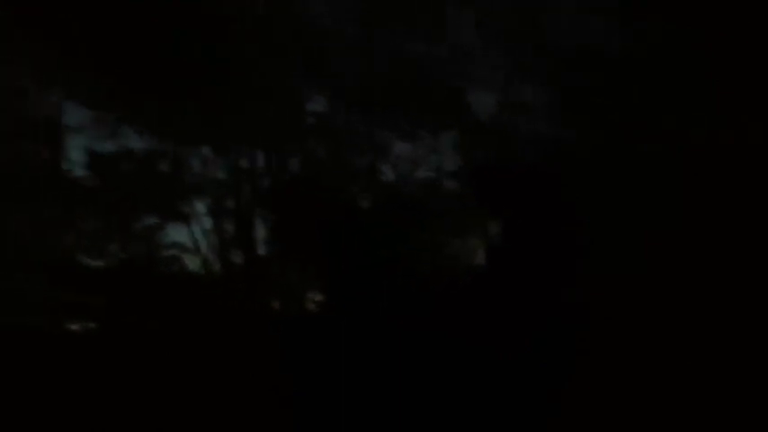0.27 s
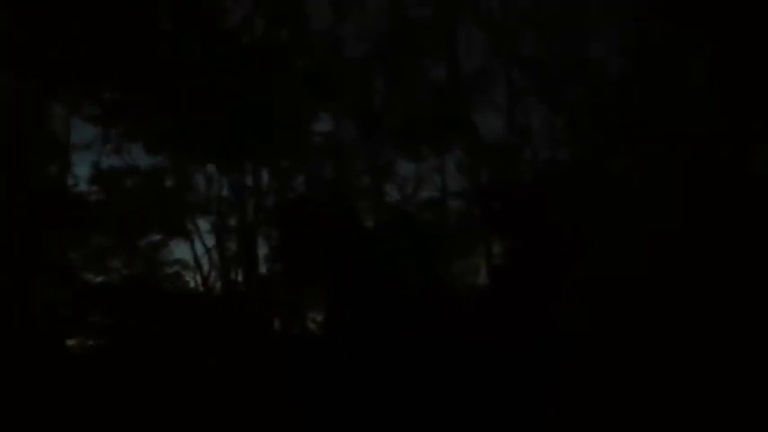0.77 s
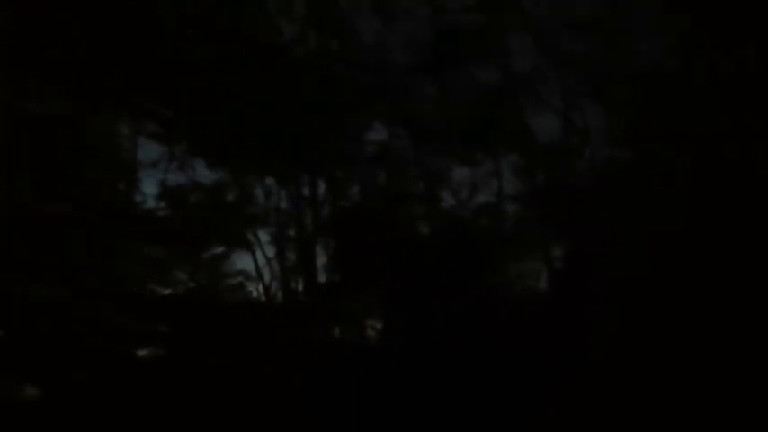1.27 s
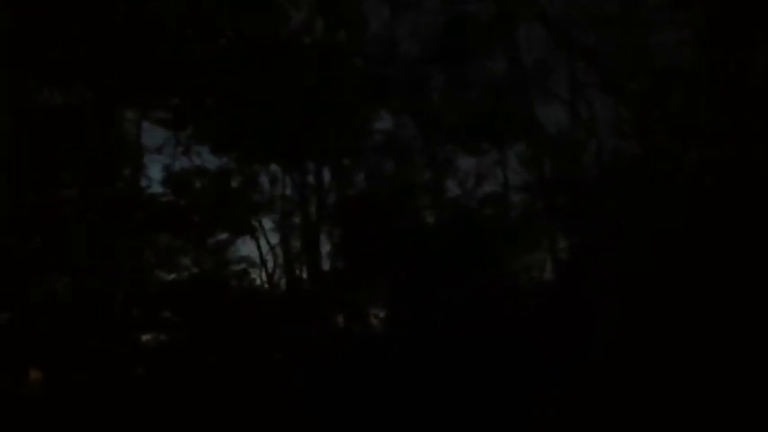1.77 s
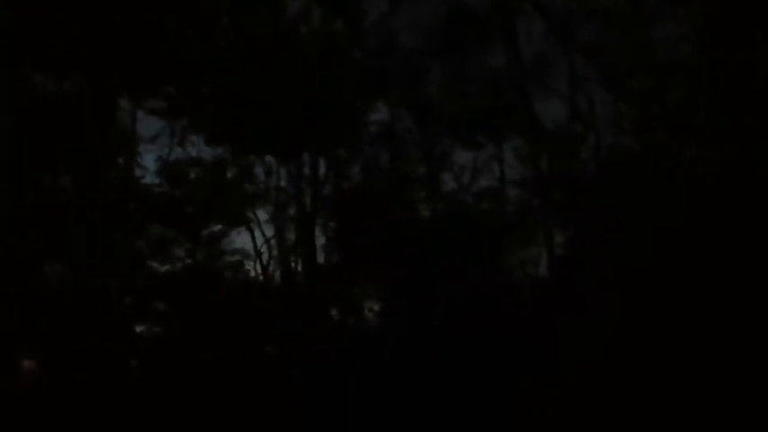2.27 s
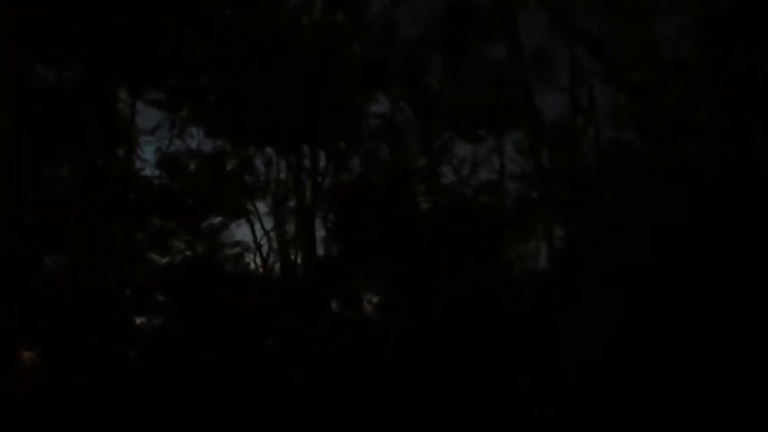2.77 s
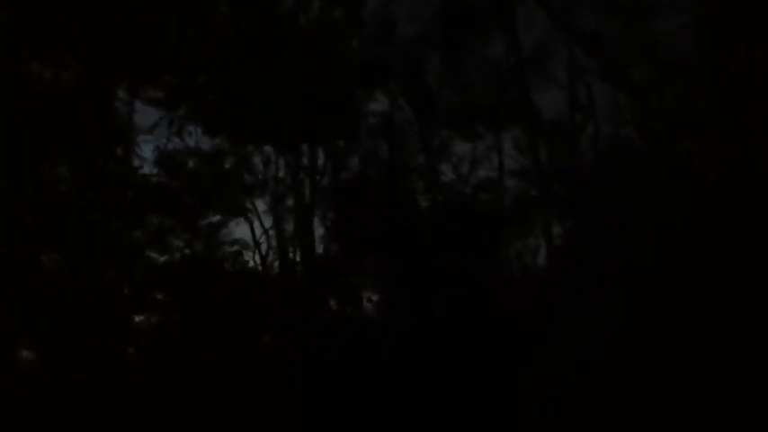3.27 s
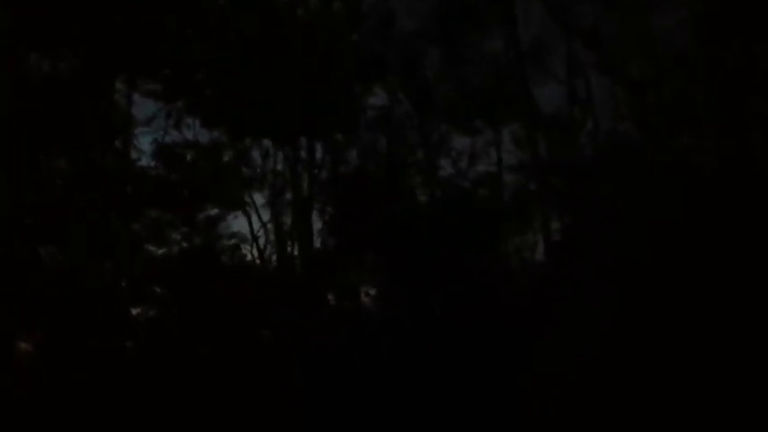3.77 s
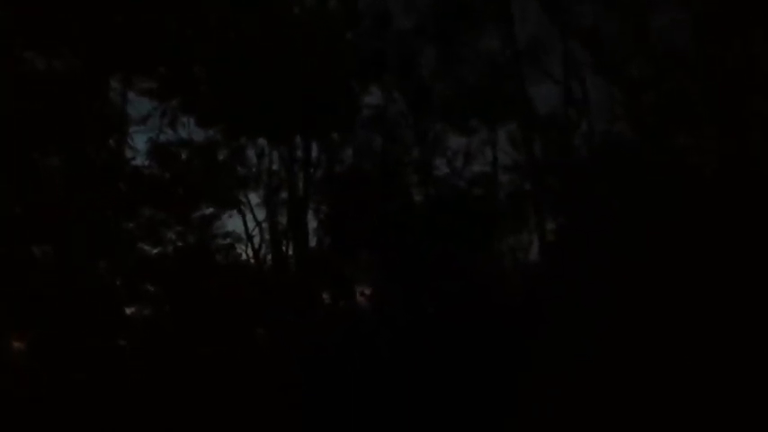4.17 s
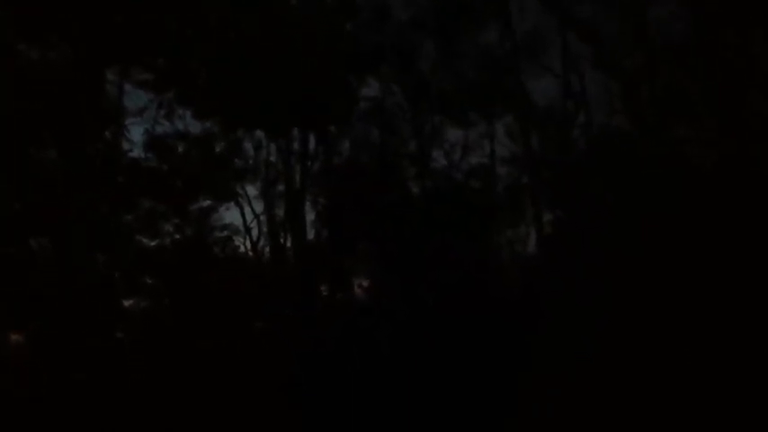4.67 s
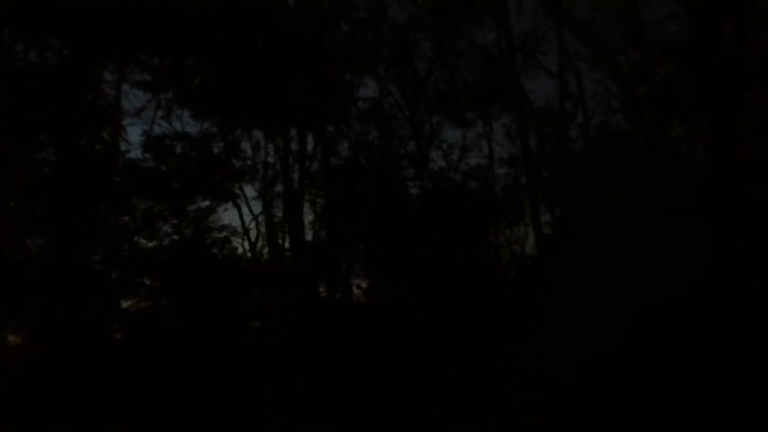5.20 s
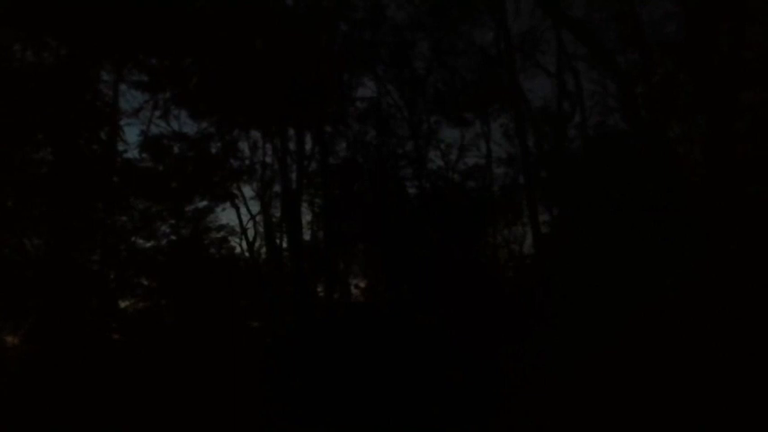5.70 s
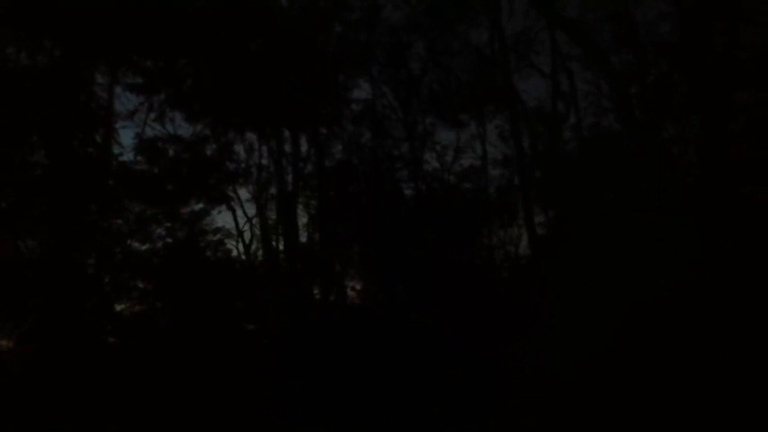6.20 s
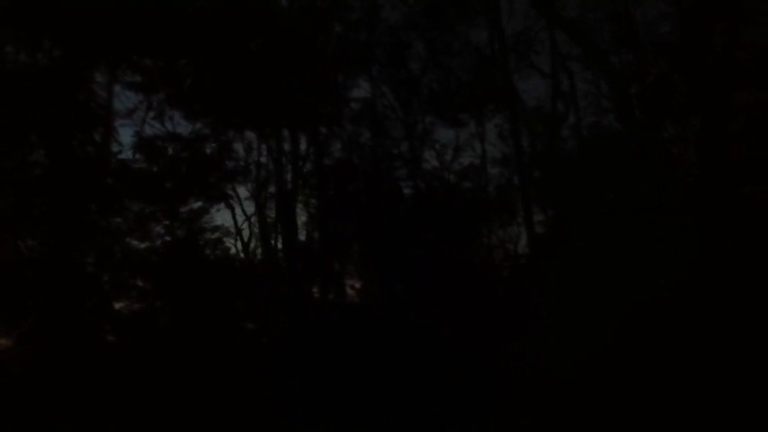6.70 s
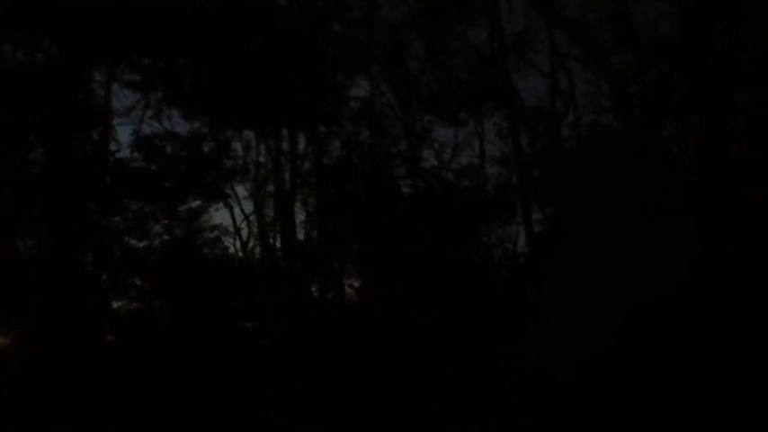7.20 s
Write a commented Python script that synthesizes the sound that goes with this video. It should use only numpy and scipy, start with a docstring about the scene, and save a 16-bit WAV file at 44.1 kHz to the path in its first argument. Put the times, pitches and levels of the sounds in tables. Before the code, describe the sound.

Continuous high insect trilling fills a wooded night, buzzing rapidly and shimmering, with faint low air beneath. Early on, bright katydid rasps lean left while fingers rub and bump the recorder on the right, with one clear knock and a few softer ones. Afterwards only tiny ticks, slight rustles, a faraway three-note bird phrase and a faint late warble touch the steady chorus.

```python
"""A night chorus of insects at two microphone ports: five near singers trill over the blur of far ones and night air.
At the start a katydid rasps five calls, and a far bird begins a falling three-note phrase it repeats to the end.
From half a second fingers bump the recorder beside the right port as the hand rubs; small things tick close by.
Faint rustling comes at the start, again before two seconds and near the end, where something warbles faintly.
Trills are tones locked to wing strokes, rasps and air are shaped noise, calls are glides, bumps are dying swings."""
import sys
import numpy as np
from scipy import signal
from scipy.fft import rfft, irfft
from scipy.io import wavfile
from scipy.ndimage import uniform_filter1d

SR = 44100
rng = np.random.default_rng(int(sys.argv[2]) if len(sys.argv) > 2 else 0)


def unload_audio(sound):
    """Save the sound as a 16-bit wav file, at the path given as the first command line argument."""
    columns = np.transpose(np.atleast_2d(sound))
    # keep every value between -1 and 1, then stretch to whole-number steps
    steps = np.round(np.clip(columns, -1, 1) * 32767)
    wavfile.write(sys.argv[1], SR, steps.astype(np.int16))


N = 328545
TIME = np.arange(N) / SR


def gain_of(db):
    """Amplitude factor of a level in dB."""
    return 10 ** (np.asarray(db) / 20)


def evened(x):
    """Scale to an rms of one."""
    return x / np.sqrt(np.mean(x ** 2) + 1e-20)


def read(points, hz):
    """Read a table of (f/Hz, value) along a logarithmic pitch scale."""
    f, value = np.transpose(points)
    return np.interp(np.log(hz + 1), np.log(f + 1), value)


def curve(rows, column):
    """Draw one column of a table over time, straight from row to row."""
    columns = np.transpose(rows)
    return np.interp(TIME, columns[0], columns[column])


def band(x, lo_hz, hi_hz):
    """Keep the sound between two pitches."""
    return signal.sosfilt(signal.butter(2, [lo_hz, hi_hz], "bandpass", fs=SR, output="sos"), x)


def port_noise():
    """Unrelated white noise at each port."""
    return rng.standard_normal((2, N))


def hiss(field_db):
    """Unrelated noise at each port, shaped by field_db(Hz, s) and by the colour of the port; mono rms is one."""
    # Unlike microphone ports: f/Hz, left minus right level/dB
    ports = [(60, -3.5), (92, -1.5), (140, -3), (210, -2), (330, -3.5), (500, -2.5), (770, -3.5),
             (1170, -2.5), (1790, -2.5), (2740, -1.5), (4190, 1), (6410, 9.5), (9810, 13), (15000, 12)]
    hz = np.fft.rfftfreq(1024, 1 / SR)[:, None]
    t = np.arange(N // 256 + 5) * 256 / SR
    real, imaginary = rng.standard_normal((len(t), len(hz), 2, 2)).T
    left_power = 1 / (1 + gain_of(-2 * read(ports, hz)))
    port_gain = np.sqrt([left_power, 1 - left_power])
    spectrum = (real + 1j * imaginary) * port_gain * gain_of(field_db(hz, t))
    out = signal.istft(spectrum, nperseg=1024, noverlap=768)[1][:, :N]
    return out / np.sqrt(np.mean(out.mean(0) ** 2))


def foliage(x, spread_s=.008, ripple_db=1.5):
    """Leaves and trunks delay each pitch by another time at each port, and colour it a little."""
    steps, ripple = rng.standard_normal((2, 2, 2049))
    # spread_s is the spread of the delay averaged over 60 Hz
    phase = np.cumsum(steps, 1) * 2 * np.pi * spread_s * np.sqrt(SR / 4096 * 60)
    colour = gain_of(ripple_db * evened(uniform_filter1d(ripple, 3)))
    paths = np.fft.fftshift(irfft(colour * np.exp(1j * phase)), 1)
    return signal.oaconvolve(x, paths, "same", axes=1)


def stroke(turns, sharpness):
    """One swell of loudness per closing of the wings, shorter as sharpness grows."""
    return evened(np.exp(sharpness * (np.cos(2 * np.pi * turns) - 1)))


def whistle(s, length, from_hz, to_hz, db, pan_db, waver):
    """A soft gliding tone that swells and fades; pan_db is left minus right, waver bends it in Hz."""
    progress = np.clip((TIME - s) / length, 0, 1)
    cycles = np.cumsum(from_hz + (to_hz - from_hz) * progress + waver) / SR
    tone = np.sin(np.pi * progress) * np.sin(2 * np.pi * cycles)
    return gain_of(db + np.array([[pan_db / 2], [-pan_db / 2]])) * 2 * tone


def near_singers():
    """Five insects close by, each with its own stroke rate, wing tones and bouts of effort."""
    # Wing strokes: rate/(strokes/s), drift/(strokes/s per s), rush/(extra strokes/s at the full-effort time),
    # sharpness of the stroke, least hoarseness as spread of a tone/Hz
    paces = [(58.72, .009, 0, .8, 1), (60.05, .057, 0, 1.4, 1.5), (57.12, -.035, 0, .9, 1.5),
             (57.2, 0, .035, .9, 1), (55.85, .107, 1.9, .9, 1.2)]
    # Wing tones, one list a singer: f/(multiples of the stroke rate)
    wing_tones = [
        [52, 64, 79, 92, 139],
        [83, 95],
        [81, 96],
        [119, 126, 131, 141, 145, 150, 154],
        [79, 91.82, 100.5, 104.33, 114.3, 142.55, 153.1],
    ]
    # Strength of each wing tone: left level/dB, right level/dB
    wing_levels = [
        [(-68, -64), (-62, -59), (-51, -51), (-39, -44), (-43, -57)],
        [(-40, -41), (-31, -33)],
        [(-54, -54), (-43, -40)],
        [(-46, -54), (-43, -51), (-35, -50), (-37, -52), (-38, -53), (-38, -54), (-39, -55)],
        [(-51, -53), (-40, -45), (-38, -40), (-36.5, -37.5), (-46, -50), (-38, -54), (-40, -57)],
    ]
    # Effort: rises from t/s, full at t/s, level before/dB, tires from t/s, level when tired/dB
    efforts = [(0, 1, 0, 6, 0), (0, 1, 0, 1.5, -3), (0, 2.5, -7, 3.9, -9), (3.5, 5.5, -6, 7, 0),
               (2.4, 3.6, -25, 4.4, -1)]
    return sum(singer(*parts) for parts in zip(paces, wing_tones, wing_levels, efforts))


def singer(pace, tones, tone_db, effort, fade_db=1.3):
    """Wing tones locked to the stroke; hoarseness is a random walk of their phase; moving air fades each tone."""
    settle_s, tiring_s = .66, .7  # a rush dies away; a singer tires
    hoarse_per_db, hoarse_per_rush = .4, 36  # Hz per dB off full effort, Hz per extra stroke/s
    rate, drift, rush, sharpness, hoarse_hz = pace
    rise_s, full_s, before_db, tire_s, tired_db = effort
    rush = rush * np.exp((full_s - np.maximum(TIME, rise_s)) / settle_s)
    effort_db = np.interp(TIME, [rise_s, full_s, tire_s, tire_s + tiring_s], [before_db, 0, 0, tired_db])
    turns = np.cumsum(rate + drift * TIME + rush) / SR
    # weak or rushed strokes are hoarse
    spread_hz = hoarse_hz + hoarse_per_db * abs(effort_db) + hoarse_per_rush * rush
    slip = np.cumsum(rng.standard_normal(N) * np.sqrt(2 * np.pi * spread_hz / SR))
    # ten fade points a second, smoothed over four
    fades = uniform_filter1d(rng.standard_normal((len(tones), 80)), 4)
    fades = [np.interp(TIME, np.arange(80) / 10, row) for row in gain_of(fade_db * evened(fades))]
    ringing = fades * np.cos(2 * np.pi * np.outer(tones, turns) + slip)
    wing = gain_of(tone_db).T @ ringing
    return foliage(np.sqrt(2) * wing * stroke(turns, sharpness) * gain_of(effort_db))


def katydid(teeth_per_s=650):
    """Uneven tooth strikes ring a broad, high wing; every call is the same pair of strokes."""
    # Calls: t/s, level/dB
    calls = [(-.067, -26), (.168, -28), (.372, -24.5), (.606, -27.5), (.83, -27)]
    # A short stroke, then a long one: delay/s, rise/s, base decay t60/s, level/dB
    strokes = [(0, 0.011, 0.13, -3), (.037, .02, 0.21, -0.5)]
    # Wing bands, the low end sounds first and dies first: f/Hz, width/Hz, level/dB, speed of decay, lead t/s
    wing_bands = [(14420, 700, -2, 0.87, 0), (13700, 1900, -6, 0.77, 0.006),
                  (12400, 2000, -12.5, 2.2, 0.021)]
    strikes = (rng.random((2, N)) < teeth_per_s / SR) * port_noise()
    teeth = strikes + 0.24 * port_noise()
    out = np.zeros((2, N))
    for hz, width, wing_db, speed, lead in wing_bands:
        drive = np.zeros(N)
        for s, db in calls:
            for after, rise, t60, part_db in strokes:
                t = TIME - s - after + lead
                decay_db = -60 * speed * np.maximum(t - rise, 0) / t60
                drive += np.clip(t / rise, 0, 1) * gain_of(db + part_db + decay_db)
        out += gain_of(wing_db) * evened(band(teeth, hz - width / 2, hz + width / 2)) * drive
    return out * gain_of([[5], [-8]])  # stronger at the left port


def place(out, s, sound, left_db):
    """Add a sound at time s, with the left port left_db against the right."""
    out[:, round(s * SR):][:, :len(sound)] += sound * gain_of([[left_db], [0]])


def without_treble(x):
    """Soft contact has little treble: a gentle low-pass at 2300 Hz."""
    return signal.lfilter(*signal.butter(2, 2300, fs=SR), x)


def bumps():
    """Soft fingertips snap against the case beside the right port; the case swings and the recorder rocks."""
    # Bumps on the case: t/s, level/dB, contact time/s
    bump_rows = [(.502, -12, 0.012), (1.0304, -2.5, 0.00053), (1.135, -14, 0.0015), (1.152, -15, 0.0061),
                 (1.167, -12.5, 0.0031)]
    case_hz, case_t60, snap_cycles = 124.5, 0.034, 0.46  # Hz, s, extra cycles run during contact
    thump_hz, thump_t60, thump_db = 49.7, 0.28, -17  # Hz, s, dB: the whole recorder rocks in the hand
    out = np.zeros((2, N))
    t = np.arange(12000) / SR
    for s, db, contact_s in bump_rows:
        cycles = case_hz * t + snap_cycles * (1 - np.exp(-t / contact_s))
        swing = -np.sin(2 * np.pi * cycles) * gain_of(-60 * t / case_t60)
        rock = np.sin(2 * np.pi * thump_hz * t) * gain_of(thump_db - 60 * t / thump_t60)
        place(out, s, (swing + rock) * gain_of(db), left_db=-35)
    return without_treble(out)


def ticks():
    """Small things tick close by: each is one short dying tone."""
    # Ticks: t/s, level/dB, f/Hz, decay t60/s, left minus right level/dB
    tick_rows = [(1.015, -12.5, 760, .008, -24), (1.869, -26.5, 1590, .03, -16),
                 (2.166, -26.5, 1400, 0.018, -7), (2.531, -36, 596, .018, -6)]
    out = np.zeros((2, N))
    t = np.arange(12000) / SR
    for s, db, hz, t60, pan_db in tick_rows:
        ring = -np.sin(2 * np.pi * hz * t) * gain_of(db - 60 * t / t60)
        place(out, s, ring, pan_db)
    return without_treble(out)


def rubbing():
    """The hand shifts on the recorder: a low rumble, mostly at the right port, and a higher creak."""
    # The hand shifting: t/s, rumble level/dB, creak level/dB, both before the port gains
    rub_rows = [(0.0, -53.5, -60), (0.176, -54, -58), (0.47, -55, -48), (0.594, -48, -53.5),
                (0.834, -49, -45), (1.004, -57, -56), (1.116, -41, -56), (1.35, -59, -68)]
    rumble = evened(band(port_noise(), 28, 153)) * gain_of(curve(rub_rows, column=1))
    creak = evened(band(port_noise(), 266, 398)) * gain_of(curve(rub_rows, column=2))
    rub = rumble * gain_of([[-8], [5]]) + creak * gain_of([[1.5], [2.5]])
    return rub * (TIME < rub_rows[-1][0])


def rustling():
    """Faint rustling close by: mid-pitched noise that swells and fades."""
    # Rustles: t/s, length/s, level at the height of the swell/dB
    rustle_rows = [(-.2, 1.0, -51), (1.65, 0.37, -49.5), (6.42, 0.3, -51)]
    leaves = evened(band(port_noise(), 500, 1400))
    return sum(leaves * gain_of(db) * np.sin(np.pi * np.clip((TIME - s) / length, 0, 1))
               for s, length, db in rustle_rows)


def bird(waver_hz=20):
    """A far bird whistles the same falling phrase again and again, wavering, blurred by the wood."""
    # Phrases: t/s, level/dB
    phrases = [(-.1, -56.5), (1.4, -61.5), (2.92, -59.5), (4.5, -62), (6.04, -56)]
    # Notes of the phrase: delay/s, length/s, from f/Hz, to f/Hz, level/dB
    notes = [(0, 0.21, 1570, 1566, 2.5), (0.351, 0.151, 1450, 1338, -4), (0.503, .15, 1290, 1260, -2)]
    waver = waver_hz * evened(uniform_filter1d(rng.standard_normal(N), 900))
    out = sum(whistle(s + after, length, from_hz, to_hz, db + note_db, pan_db=6.5, waver=waver)
              for s, db in phrases for after, length, from_hz, to_hz, note_db in notes)
    return foliage(out, spread_s=0.011)


def warble():
    """A faint bubbling of short glides."""
    # Glides: t/s, length/s, from f/Hz, to f/Hz, level/dB
    glides = [(6.491, 0.044, 835, 1174, -55), (6.507, 0.046, 1150, 850, -52),
              (6.544, 0.051, 1150, 1280, -56), (6.558, .065, 730, 880, -56), (6.675, 0.034, 915, 935, -53)]
    return sum(whistle(*row, pan_db=0.0, waver=0) for row in glides)


def thin_lines(x, lines_db=3.5):
    """Single far singers stand out of the blur as thin tones that last about a second."""
    spectrum = signal.stft(x, nperseg=4096)[2]
    lines = uniform_filter1d(rng.standard_normal(spectrum.shape[1:]), 18, axis=1)
    out = signal.istft(spectrum * gain_of(lines_db * evened(lines)), nperseg=4096)[1][:, :N]
    return evened(out) * np.sqrt(np.mean(x ** 2))


def far_chorus(patchy_db=.8):
    """Too many singers to tell apart: drifting patches of hiss, a share of it throbbing with one stroke."""
    # Colour of the far singers: f/Hz, relative level/dB per Hz
    colour = [(1760, -55), (3100, -27.5), (3700, -18.5), (4000, -20), (4500, -11), (5100, -6), (5750, -5),
              (6100, -7), (6750, -12.5), (7300, -4.5), (8300, -3), (10800, -18.5), (12600, -16.5),
              (14700, -19), (15900, -26)]
    # Their effort, used about its mean: t/s, level/dB
    swell_rows = [(0.05, -34.5), (2.32, -31.5), (6.74, -30), (7.4, -31.5)]
    # How far each pitch follows the effort: f/Hz, share of the swell
    follows = [(3000, 0.13), (5500, 0.6), (6700, 0.16), (8000, 0.44), (13000, 1.65)]
    # How much of each pitch throbs: f/Hz, share
    rasp = [(3000, .02), (5000, .03), (6300, .2), (8000, .04), (12000, .11), (15000, .09)]

    def field_db(hz, t):
        patches = uniform_filter1d(rng.standard_normal((len(t), len(hz))), 40, 0)
        patches = uniform_filter1d(patches, 5, 1).T
        swell = np.interp(t, *np.transpose(swell_rows)) - np.mean(swell_rows, 0)[1]
        return read(colour, hz) + read(follows, hz) * swell + patchy_db * evened(patches)

    blur = thin_lines(hiss(field_db))
    share = np.clip(read(rasp, np.fft.rfftfreq(N, 1 / SR)), 0, 1)
    throbbing = irfft(rfft(blur) * share, N)
    beat = stroke(56.5 * TIME, 1.1)  # 56.5 strokes a second
    return gain_of(-29.8) * (blur + throbbing * (beat / beat.mean() - 1))


def night_air():
    """Steady hiss of the night air, strongest in the bass."""
    # Colour of the air: f/Hz, relative level/dB per Hz
    colour = [(8.8, -28), (15, 2), (22, 1.5), (85, -5), (577, -13), (759, -13.5), (1140, -16), (1580, -19),
              (1690, -18.5), (3500, -18), (4550, -52), (7700, -120)]
    return gain_of(-47.5) * hiss(lambda hz, t: read(colour, hz) + 0 * t)


def scene():
    """All sources together, from the near singers to the night air."""
    near = near_singers() + katydid()
    handling = bumps() + ticks() + rubbing() + rustling()
    far = bird() + warble() + far_chorus() + night_air()
    return near + handling + far


def record(dry):
    """The recorder: a band limit, then a small converter offset."""
    edge_hz, offset = 15850, -.0027  # offset as a share of full scale
    low_pass = signal.firwin(511, edge_hz, window=("kaiser", 9), fs=SR)
    return signal.oaconvolve(dry, low_pass[None], "same") + offset


dry = scene()
out = record(dry)
unload_audio(out)
```